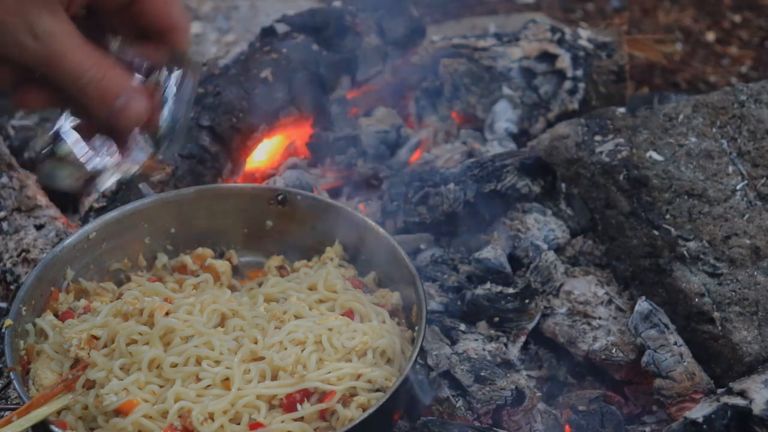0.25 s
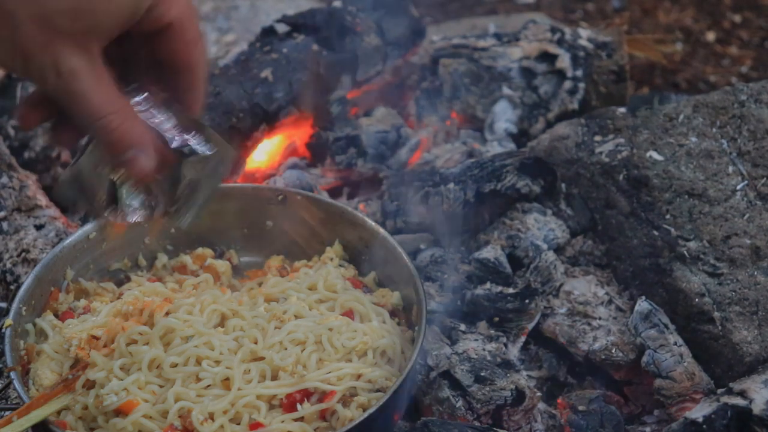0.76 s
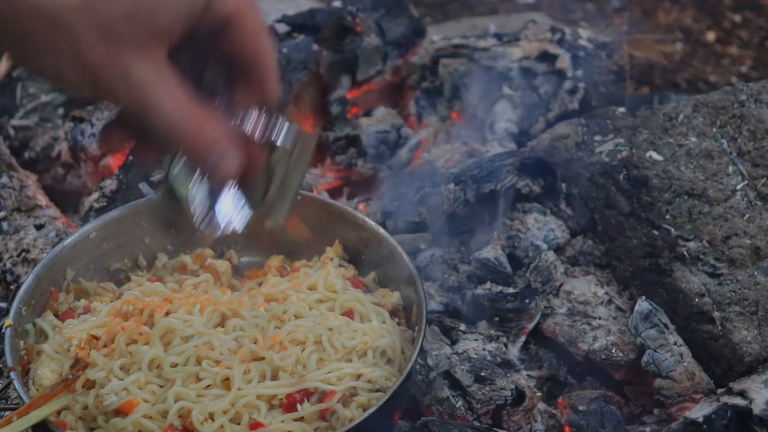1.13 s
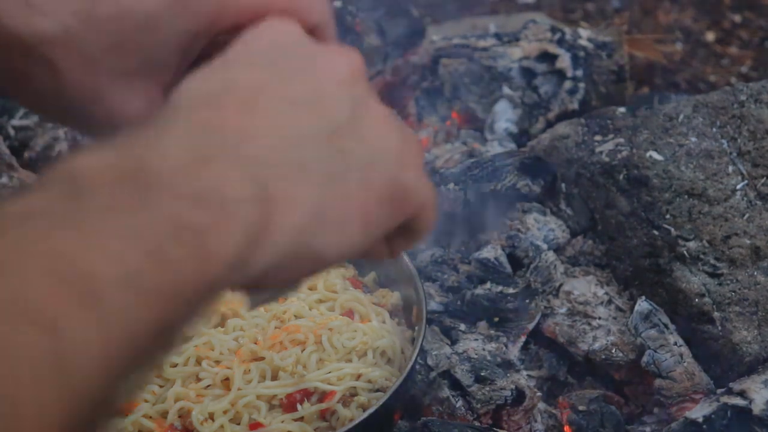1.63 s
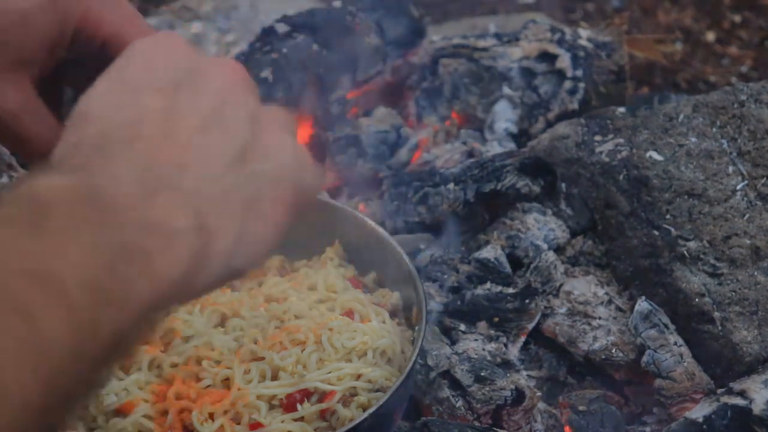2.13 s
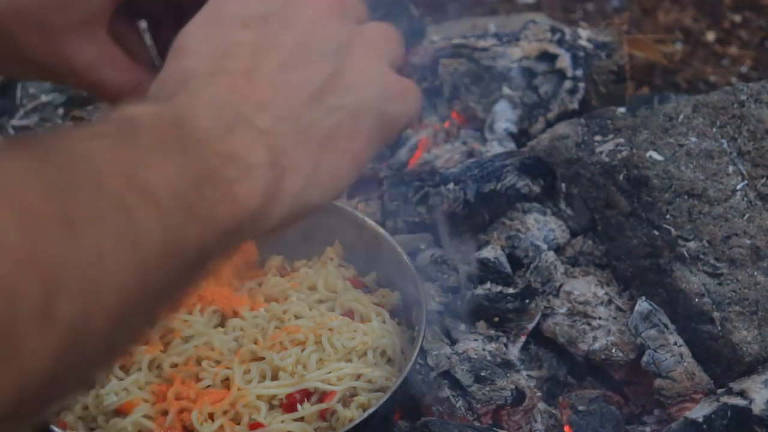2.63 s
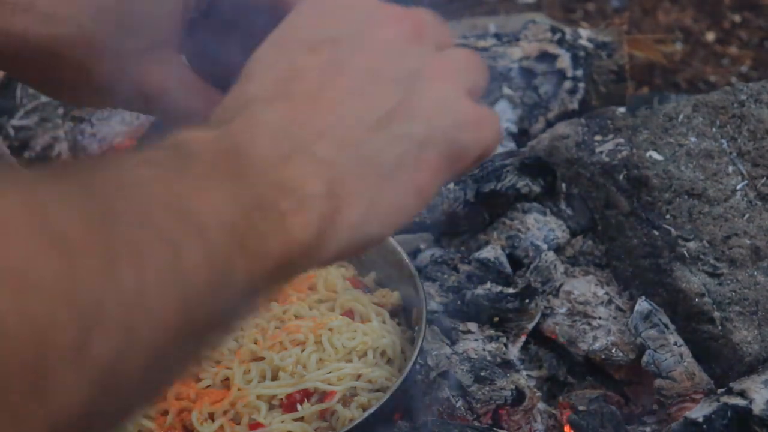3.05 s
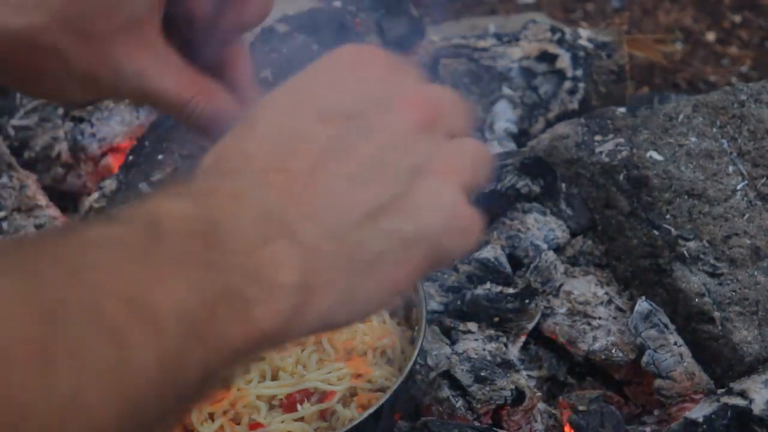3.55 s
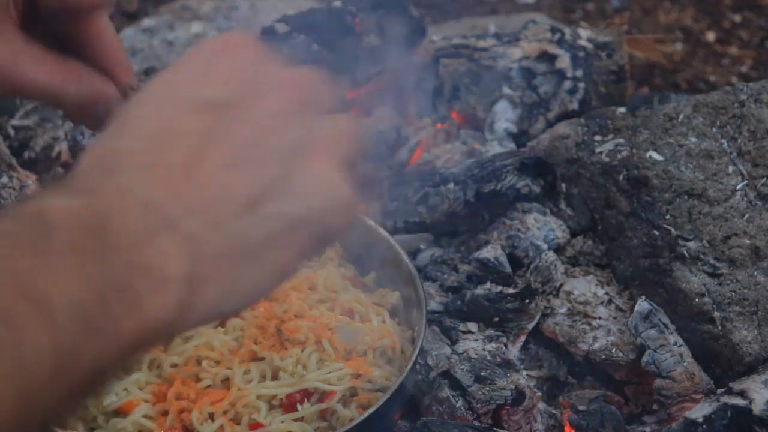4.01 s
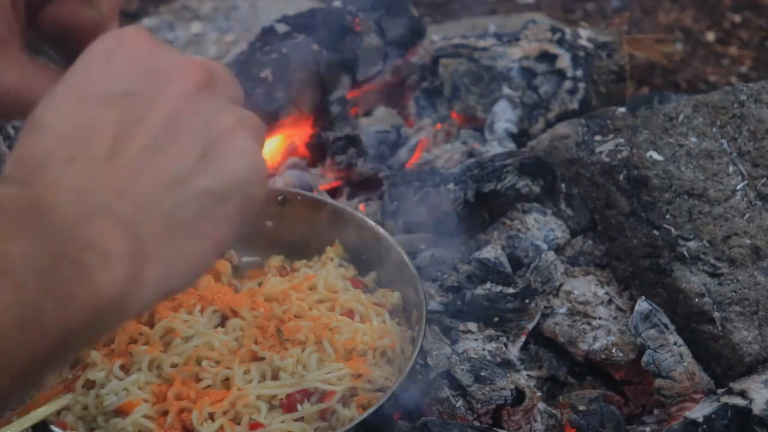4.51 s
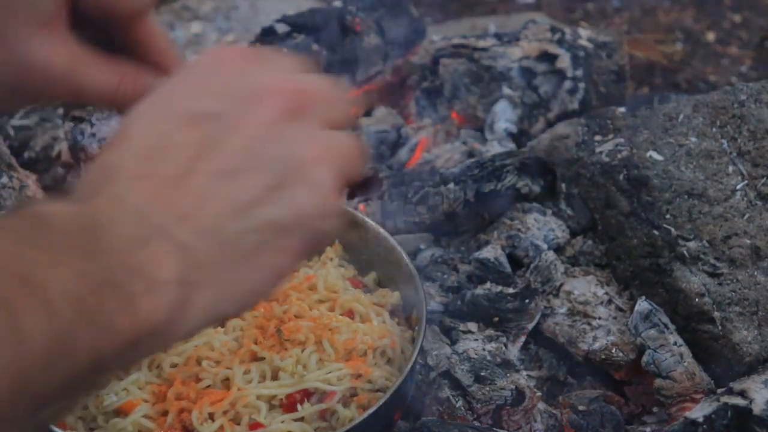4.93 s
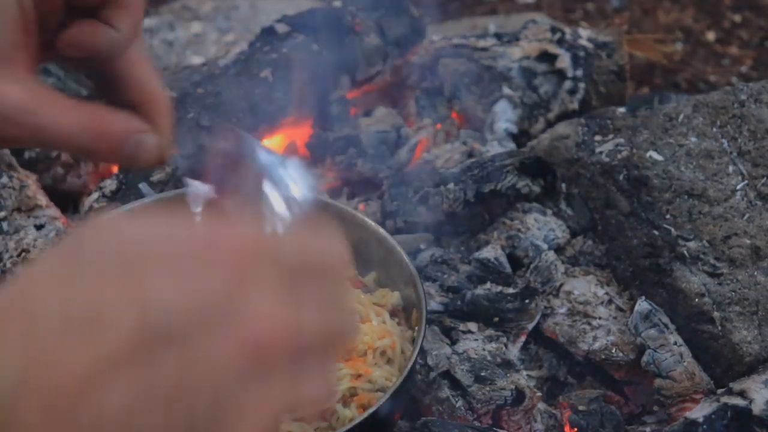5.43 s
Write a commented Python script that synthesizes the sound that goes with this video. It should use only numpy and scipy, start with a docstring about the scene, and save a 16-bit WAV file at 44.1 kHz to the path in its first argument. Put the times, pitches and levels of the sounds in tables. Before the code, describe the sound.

A small foil packet is squeezed and crinkled close up, sparse sharp ticks growing into dense crackling, over a faint simmering pan and campfire rumble.

```python
"""Fingers squeeze a foil sachet: its creases buckle in short noisy snaps close to a microphone.
Each snap is noise with a sharp crack, ringing the pouch, a flat facet and the stiff edge in its own mix.
Smaller creases rustle between the snaps as dense noisy ticks that ring panels of four sizes.
Behind the foil, a pan simmers on a rumbling camp fire as flickering noise bands with tiny bursts,
and narrow bands of noise make a faint wavering hum."""
import sys
import numpy as np
from scipy import signal
from scipy.io import wavfile
from scipy.ndimage import uniform_filter1d

SR = 44100
rng = np.random.default_rng(int(sys.argv[2]) if len(sys.argv) > 2 else 0)


def int16_out(signal):
    """Quantize to a 16-bit WAV file."""
    q = np.round(np.clip(np.atleast_2d(signal).T, -1, 1) * 32767)
    wavfile.write(sys.argv[1], SR, q.astype(np.int16))


N = 250047

# clearest buckling creases: start_s, level_db (before the gain of each ringing part), length_ms,
# pouch_hz, pouch_db, edge_db (pouch and edge relative to the facet)
CLEAR_CREASES = [(0.0089, -26, 0.86, 676, -17, 0.5), (0.0494, -24, 1.4, 696, -11.5, -3),
                 (0.0672, -35, 1.2, 520, -7, 1), (0.3582, -29, 1.5, 1510, -6.5, -7.5),
                 (0.5967, -25.5, 1.13, 1390, -2.5, -7.5), (0.7891, -31.5, 1.4, 1380, -0.5, -22),
                 (0.801, -32, 1.7, 780, 3, -22), (0.8674, -39.5, 4, 915, -13, -15),
                 (0.9798, -27.5, 1.4, 1110, -27, 7), (1.2739, -30.5, 2.7, 1380, 4.5, 2.5),
                 (1.3254, -42.5, 5.6, 820, -8, 19), (1.3726, -39.5, 5, 1040, -27, -20),
                 (1.352, -41, 2.4, 580, -17, -13), (1.4723, -39, 1.1, 900, -14, -8),
                 (1.5103, -42, 1.3, 450, -17, -16), (1.7436, -31.5, 3.1, 1310, -11, 0.5),
                 (1.819, -38.5, 5.4, 670, 2, 0), (1.928, -31, 1.4, 1150, -10.5, -11),
                 (1.9732, -33.5, 0.91, 655, 1.5, 3), (1.9882, -35, 2.4, 1170, -6, -21),
                 (2.0256, -43.5, 5.7, 810, -5, -10), (2.168, -39, 0.82, 1090, -3, -17),
                 (2.211, -41, 5.1, 1090, -10, -21), (2.255, -37, 1.4, 1060, -11, -20),
                 (2.2982, -28, 0.99, 830, -21, 4.5), (2.3477, -35, 0.64, 1040, -10, -16),
                 (2.4076, -37.5, 2.8, 1090, 1, -8), (2.4485, -32.5, 0.68, 1250, 2, -11),
                 (2.4737, -33, 3.7, 1000, 7, 4), (2.539, -33, 0.76, 1000, -7, -18),
                 (2.5547, -29, 4.4, 1360, -2, -9), (2.6106, -39, 2.7, 583, 0.5, -2),
                 (2.6958, -34.5, 2.5, 1050, -12, -11), (2.7509, -17, 1.16, 1290, -9, -6.5),
                 (2.7716, -21.5, 2.3, 1440, -12, -6), (2.8583, -27, 3.9, 970, -6.5, 3.5),
                 (2.9083, -24.5, 2.4, 1310, 1, 9), (2.93, -31, 1.7, 920, -5, -3),
                 (2.973, -39, 8.1, 1320, 7, 5), (3.0303, -33, 6.3, 695, -5.5, 1),
                 (3.1065, -31, 10.6, 850, 2.5, 2.5), (3.1734, -26, 5.1, 1000, 0, 1),
                 (3.1879, -18, 0.88, 1720, -3, -3), (3.1953, -18.5, 0.97, 1710, 2, -8),
                 (3.25, -25.5, 1.24, 1230, -8.5, -10), (3.2763, -29.5, 10.4, 1380, -1, -1),
                 (3.3364, -35, 1.9, 850, 5, 7), (3.429, -31, 2.05, 660, -3, -1.5),
                 (3.4905, -12, 2.37, 760, -10, -11.5), (3.5078, -29, 7.5, 950, -4, -3),
                 (3.613, -25.5, 6.5, 576, 2, 0.5), (3.6532, -21.5, 1.15, 754, 4, 13.5),
                 (3.661, -22.5, 2.4, 1510, 7, 8.5), (3.7023, -27, 2.1, 1520, 11, 10),
                 (3.7232, -44, 2.5, 920, 13, -7), (3.7709, -25, 6.5, 660, 2, 5.5),
                 (3.8248, -27.5, 2.6, 920, -6, -1), (3.915, -26.5, 6.2, 770, -1, 3.5),
                 (3.954, -23, 1.2, 750, -13, 10), (4.0247, -23.5, 0.63, 1640, 10, -15),
                 (4.0686, -23.5, 3.2, 640, 2, 6.5), (4.1051, -34, 5.5, 880, -7, -2),
                 (4.1583, -22.5, 3.2, 970, -13.5, -4), (4.192, -30, 3.8, 1150, 1, -1),
                 (4.2253, -30, 8.4, 870, 1, 0), (4.265, -29, 4.8, 1080, -15, -6),
                 (4.2965, -23, 6.3, 835, -23, -5), (4.3367, -20, 3.8, 1210, -6, -8),
                 (4.3958, -21.5, 3.1, 645, 13.5, -3), (4.3991, -22, 5.6, 920, -1, 0),
                 (4.435, -17.5, 1.7, 726, -8, 2), (4.4661, -27.5, 7, 1320, -9, -5),
                 (4.4775, -23, 1.2, 1580, -11, -14), (4.5096, -30, 1.7, 1180, -18, -11),
                 (4.5466, -28.5, 13, 784, -10, -2), (4.5952, -24.5, 8.9, 1120, -24, -0.5),
                 (4.655, -28, 3.1, 890, -3, 3.5), (4.7246, -36, 2, 1240, -10, -7),
                 (4.758, -29, 0.6, 1150, -14, -17), (4.8029, -23.5, 7.2, 1030, -2.5, -5),
                 (4.848, -33, 16, 1150, -1, -2), (4.8927, -33, 7.4, 950, -13, -9),
                 (4.9029, -23, 2.7, 1100, -13, -5), (4.9252, -29.5, 1.3, 1000, -19, 3),
                 (4.9979, -13, 2.4, 680, -5, -8.5), (5.0345, -22, 4, 975, -10, -6),
                 (5.0707, -23.5, 1.8, 1000, -11, 5), (5.1103, -26, 3.5, 1290, -14, -1),
                 (5.1507, -12.5, 4.3, 720, 5, 2), (5.1903, -18.5, 1.1, 815, -5, 10),
                 (5.2193, -25.5, 4.2, 1170, -3, 7.5), (5.2272, -28.5, 1.8, 790, -9, 5),
                 (5.3017, -31.5, 0.35, 530, -21, 9), (5.3258, -24.5, 0.33, 1160, -19, -10),
                 (5.3578, -26.5, 1.9, 1320, -22, -1), (5.3901, -19.5, 1.3, 700, -21, -2),
                 (5.451, -26, 1.5, 400, 6, -15), (5.49, -24.5, 2.1, 1010, -17, -2),
                 (5.4967, -17.5, 5.6, 596, 0.5, -0.5)]
# grip of the fingers, setting the base level of the small creases: time_s, level_db, brightness_db (not used)
GRIP = [(0, -53, 2), (.15, -52.5, 1.5), (1.27, -62.5, 0.5), (1.39, -53, -3), (1.51, -54, -2),
        (1.58, -66, -2), (2.12, -59, -6), (2.19, -49, -9), (2.7, -49.5, -3), (3.7, -48.5, -5),
        (4.1, -39, -1), (4.5, -41.5, -1), (5.22, -45.5, 3.5), (5.3, -51, 4), (5.5, -46, 0.5),
        (5.56, -49.5, 0.5)]


def undb(db):
    """Decibels express an amplitude ratio on a logarithmic scale; this inverts it."""
    return 10 ** (np.asarray(db) / 20)


def level(x, db):
    """Root-mean-square scaling: multiply x by the gain db over its own RMS."""
    return x * undb(db) / np.sqrt(np.mean(x ** 2))


def band(lo_hz, hi_hz, order=2):
    """Butterworth band-pass: a resonant region with a smooth, flat top."""
    return signal.butter(order, [lo_hz, min(hi_hz, .45 * SR)], "bandpass", fs=SR, output="sos")


def fade(x, ms):
    """Exponential decay: a one-pole filter lets every impulse die away with time constant ms."""
    return signal.lfilter([1], [1, -np.exp(-1000 / (ms * SR))], x)


def walk(rate_hz):
    """Slow random modulation: levels held for 1 / rate_hz s and slewed; spread a little under 1."""
    hold = int(SR / rate_hz)
    steps = np.repeat(rng.standard_normal(N // hold + 1), hold)
    return uniform_filter1d(steps, hold)[:N]


def hum():
    """Narrow-band noise: a tone of small bandwidth wavers in amplitude and phase."""
    # low tones: centre_hz, width_hz, level_db
    tones = [(70.3, 14, -71.5), (216, 5.5, -75.5)]
    out = 0
    for hz, width_hz, db in tones:
        noise = rng.standard_normal(N)
        tone = signal.sosfilt(band(hz - width_hz / 2, hz + width_hz / 2, order=1), noise)
        out = out + level(tone, db)
    return out


def simmer(level_db=-58, bubble_hz=300, bubble_spread_db=2.9, bubble_ms=1.0, flicker_db=0.82):
    """Filtered noise: half-octave bands flicker independently, peppered with tiny bursting bubbles."""
    # spectrum of pan and fire: frequency_hz, density_db (per Hz, relative)
    spectrum = [(30, -4), (110, 3.5), (520, -8), (1600, -8), (4500, -14), (9000, -22.5), (16000, -16.5)]
    hz, db = np.transpose(spectrum)
    bursts = rng.random(N) < bubble_hz / SR
    bubble_gain = undb(bubble_spread_db * np.minimum(rng.exponential(size=N), 4))
    bubbles = fade(bursts * bubble_gain, bubble_ms)
    out = 0
    for mid_hz in 35 * 2 ** np.arange(0, 9.5, .5):
        # bubbles stir the treble fully and the bass little
        grain = 1 + 1.09 * min(mid_hz / 2000, 1) * bubbles
        part = signal.sosfilt(band(mid_hz / 1.2, mid_hz * 1.2), grain * rng.standard_normal(N))
        density_db = np.interp(np.log(mid_hz), np.log(hz), db)
        out = out + part * undb(density_db + flicker_db * walk(6.5))
    return level(out, level_db)


def foil_strain(creases, after_ms=7.5, before_ms=3.35):
    """Strain spreads around each long snap: it rises before the start and decays after it."""
    time_s, grip_db = np.transpose(GRIP)[:2]
    start_s, snap_db, length_ms = np.transpose(creases)[:3]
    excess_db = snap_db - np.interp(start_s, time_s, grip_db)
    strain = np.zeros(N)
    strain[(start_s * SR).astype(int)] = np.sqrt(np.clip(length_ms - .8, 0, None)) * undb(0.58 * excess_db)
    after = fade(strain, after_ms)
    around = fade(after[::-1], before_ms)[::-1]  # time reversal makes the rise
    return around / (before_ms * SR / 1000)


def rustle(creases, rate_hz=1150, spread_db=4.5, colour_db=8.0, flurry_db=2.0, idle=0.44, near_db=-7):
    """Random impulses excite panel resonances: dense small creases of uneven size and colour.

    They crowd around the long snaps, where the foil moves.
    """
    # panels rung by small creases: low_hz, high_hz, level_db (before the grip), ring_ms
    panels = [(192, 543, -17, 2.4), (934, 2910, -4.5, 1.42), (3620, 6000, -5, 0.84),
              (6000, 12900, -6.5, 0.9)]
    large_panel_gain, firm_db = 0.2, -48  # large panels speak up by this many dB per dB of grip over firm
    time_s, level_db = np.transpose(GRIP)[:2]
    grip_db = np.interp(np.arange(N) / SR, time_s, level_db)
    strain = foil_strain(creases)
    ticks = (rng.random(N) < rate_hz / SR) * undb(spread_db * np.minimum(rng.exponential(size=N), 3.0))
    out = 0
    for lo_hz, hi_hz, part_db, ring_ms in panels:
        envelope = fade(ticks * undb(colour_db * rng.standard_normal(N)), ring_ms)
        panel = signal.sosfilt(band(lo_hz, hi_hz), envelope * rng.standard_normal(N))
        panel = level(panel, part_db)
        if lo_hz < 2000:
            panel = panel * undb(large_panel_gain * (grip_db - firm_db))
        out = out + panel
    return out * (idle + undb(near_db) * strain) * undb(grip_db + flurry_db * walk(35))


def neighbours(scatter_db=2.5, colour_db=2.0):
    """Triggered buckling: a snap sets off a lesser one shortly after it or, less often, before it.

    Returns rows with the columns of CLEAR_CREASES.
    """
    lag_ms, over_grip_db, typical_ms, typical_hz = 11, 9, 2.93, 960
    typical_pouch_db, typical_edge_db = -9.5, -3.5
    squeeze_db = -52  # neighbours join only where the grip exceeds this
    time_s, level_db = np.transpose(GRIP)[:2]
    clear_s, clear_db = np.transpose(CLEAR_CREASES)[:2]
    chance = rng.standard_normal((len(CLEAR_CREASES), 7)).T
    side = np.where(chance[0] > -.8, 1, -1)
    start_s = clear_s + side * lag_ms / 1000 * np.exp(0.32 * chance[1])
    grip_db = np.interp(start_s, time_s, level_db)
    # always at least 3 dB below the clear crease
    size_db = np.minimum(grip_db + over_grip_db + scatter_db * chance[2], clear_db - 3)
    length_ms = np.clip(typical_ms * np.exp(0.39 * chance[3]), .7, 12)
    pouch_hz = np.clip(typical_hz * np.exp(0.29 * chance[4]), 750, 1500)
    pouch_db = typical_pouch_db + colour_db * chance[5]
    edge_db = typical_edge_db + colour_db * chance[6]
    rows = np.transpose([start_s, size_db, length_ms, pouch_hz, pouch_db, edge_db])
    return rows[(grip_db > squeeze_db) & (start_s > 0)]


def snaps(creases, size=1536, tail_db=-24, tail_ms=2.6, grain_db=3.0, crack=8.6, knock=0.28):
    """Buckling instability: a crease cracks, slips unevenly, rings its parts and settles in faint crackle."""
    # ringing parts, in the order pouch, facet, stiff edge: level_db, ring_ms
    rings = [(-6.5, 2.27), (-8, 0.91), (-8.5, 0.71)]
    pouch_top_hz, edge_band_hz = 1970, (6600, 14700)
    # facets differ in size; a crease that leaves the pouch quiet sits on a smaller, higher one
    typical_facet_hz, facet_spread, facet_hz_per_db = 3490, 0.083, -22
    out = np.zeros(N + size)
    ms = np.arange(size) * 1000 / SR
    for start_s, db, length_ms, pouch_hz, pouch_db, edge_db in creases:
        facet_hz = typical_facet_hz + facet_hz_per_db * pouch_db
        facet_hz = facet_hz * np.exp(facet_spread * rng.standard_normal())
        noise = rng.standard_normal((4, size))
        # the slip stutters every third of a ms
        slips = undb(grain_db * np.repeat(noise[3, :size // 16], 16))
        share = undb([pouch_db, 0, edge_db])
        share /= np.sqrt(np.sum(share ** 2))
        energy = (length_ms + 1.0) * SR / 1000
        # a slack, low pouch rings broad and deep, a taut one narrow
        pouch_band = (pouch_hz ** 2 / pouch_top_hz, min(2.04 * pouch_hz, 1.28 * pouch_top_hz))
        facet_band = (facet_hz / 1.69, facet_hz * 1.365)
        spans = [pouch_band, facet_band, edge_band_hz]
        attack = np.minimum(ms / (0.073 + 0.13 * length_ms), 1)
        since_hold = np.clip(ms - max(length_ms - 1.2, 0), 0, None)
        crackle = undb(tail_db) * np.exp(-since_hold / tail_ms)
        at = int(start_s * SR)
        for k, (part_db, ring_ms) in enumerate(rings):
            envelope = attack * (np.exp(-since_hold / ring_ms) + crackle)
            push = envelope * slips * noise[k]
            push[4] -= crack / length_ms ** 2  # short creases give way in one sharp crack
            burst = signal.sosfilt(band(*spans[k]), push)
            if k < 2:  # pouch and facet knock at their own pitch
                pitch_hz = (pouch_hz, facet_hz)[k]
                resonance = band(pitch_hz / 1.15, pitch_hz * 1.15, order=1)
                burst = burst + knock * signal.sosfilt(resonance, burst)
            gain = share[k] * undb(db + part_db) * np.sqrt(energy / np.sum(burst ** 2))
            out[at:at + size] += burst * gain
    return out[:N]


def early_echoes(foil, level_db=-36.5):
    """Early reflections: the pan and stones send back soft, decaying echoes within some ms."""
    lag_s = np.arange(900) / SR
    echoes = rng.standard_normal(900) * np.exp(-lag_s / 0.01) * (lag_s > .0015)
    return undb(level_db) * signal.fftconvolve(foil, echoes)[:N]


def scene():
    """Superposition: foil with its echoes, simmering pan and hum add linearly."""
    creases = np.vstack([CLEAR_CREASES, neighbours()])
    foil = snaps(creases) + rustle(creases)
    near = foil + early_echoes(foil)
    return (near + simmer() + hum())[None]


def record(dry):
    """Housing resonance colours the treble with peaks and dips; low-passes cut the top in two steps."""
    # housing colour: centre_hz, width_hz, gain_db
    housing = [(4450, 960, 3), (6160, 1050, -10), (8630, 2350, 9.5), (14500, 16100, -7.5)]
    edge_hz, top_hz = 15800, 16600
    out = dry
    for hz, width_hz, db in housing:
        b, a = signal.iirpeak(hz, hz / width_hz, fs=SR)
        out = out + (undb(db) - 1) * signal.lfilter(b, a, out)
    edge = signal.sosfilt(signal.ellip(6, .2, 22, edge_hz, fs=SR, output="sos"), out)
    return signal.sosfilt(signal.ellip(10, .2, 80, top_hz, fs=SR, output="sos"), edge)


dry = scene()
out = record(dry)
int16_out(out)
```